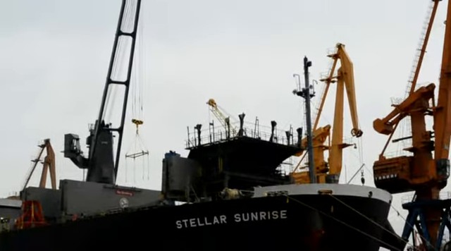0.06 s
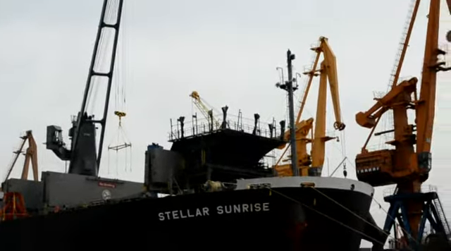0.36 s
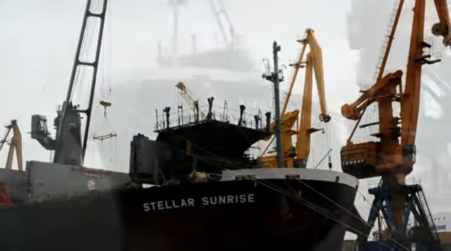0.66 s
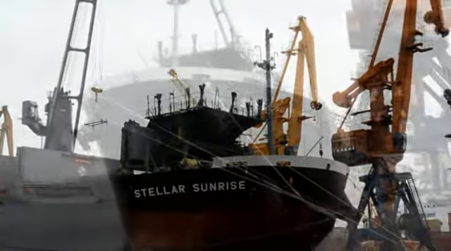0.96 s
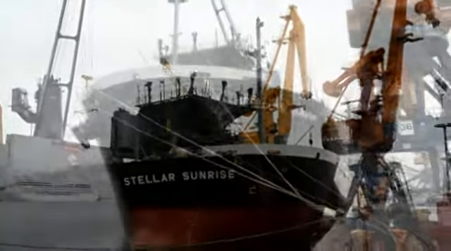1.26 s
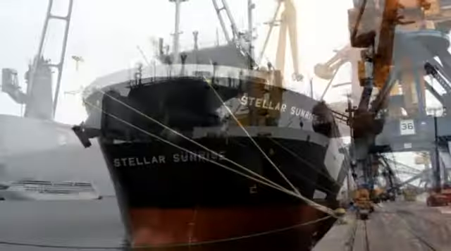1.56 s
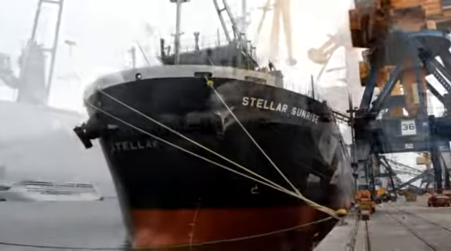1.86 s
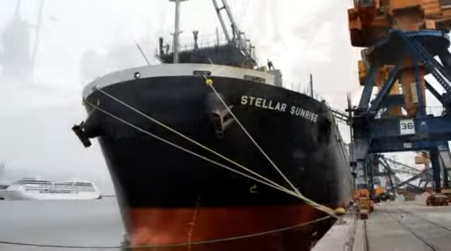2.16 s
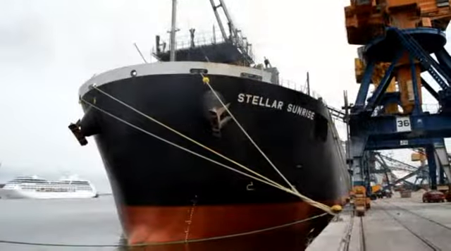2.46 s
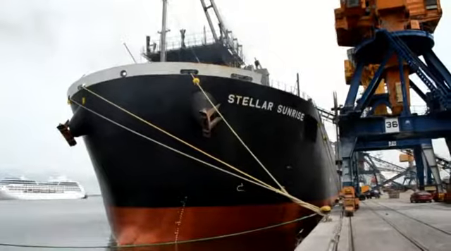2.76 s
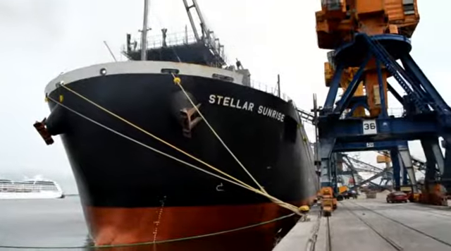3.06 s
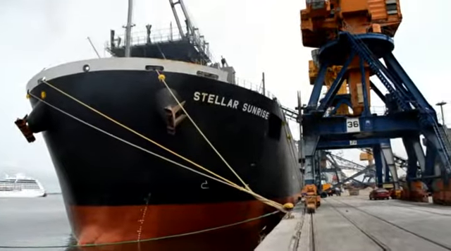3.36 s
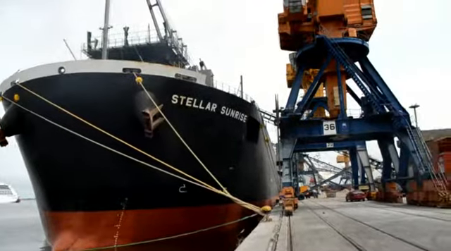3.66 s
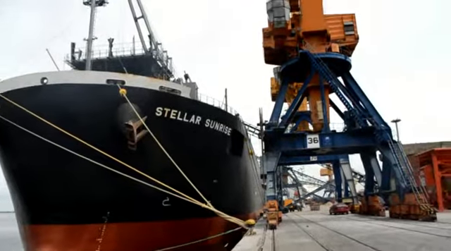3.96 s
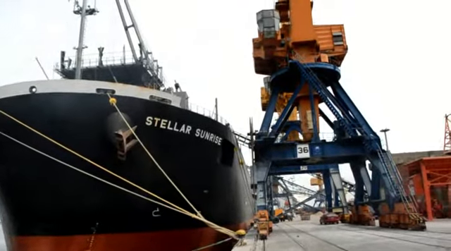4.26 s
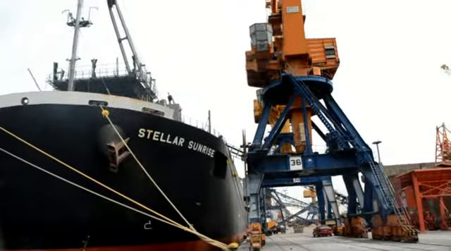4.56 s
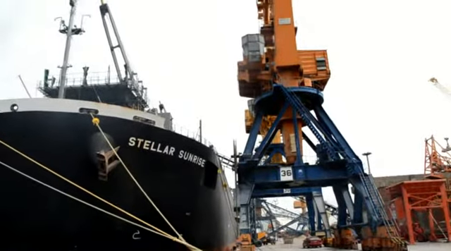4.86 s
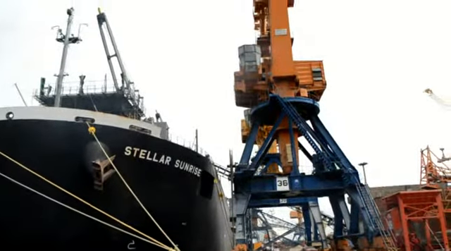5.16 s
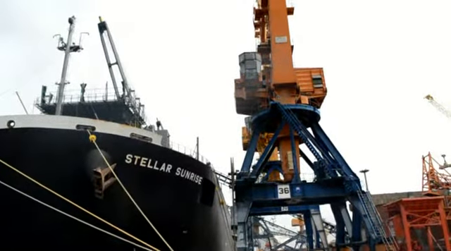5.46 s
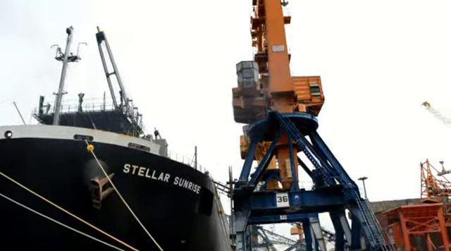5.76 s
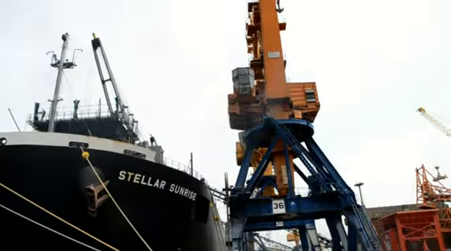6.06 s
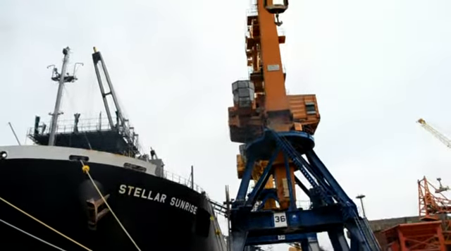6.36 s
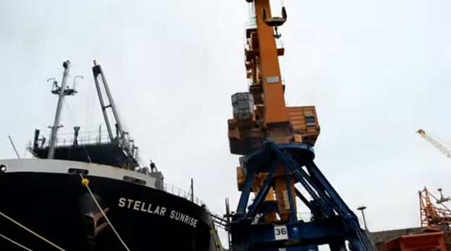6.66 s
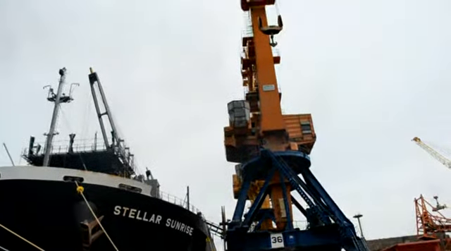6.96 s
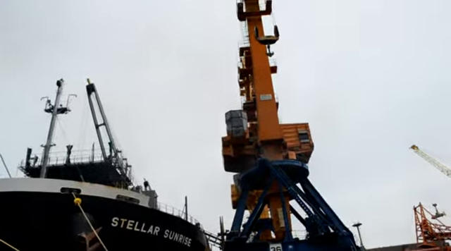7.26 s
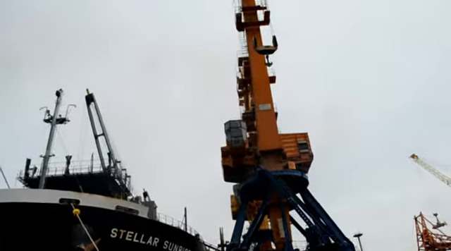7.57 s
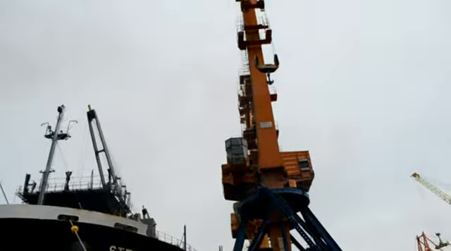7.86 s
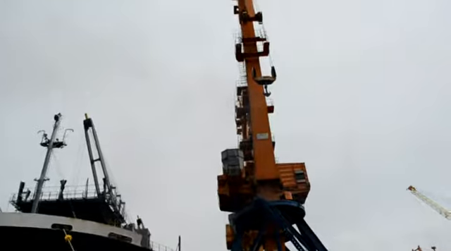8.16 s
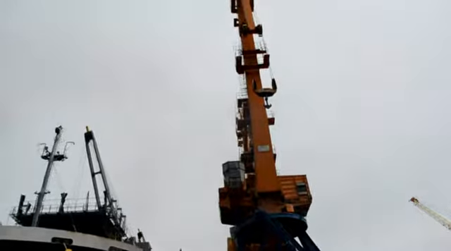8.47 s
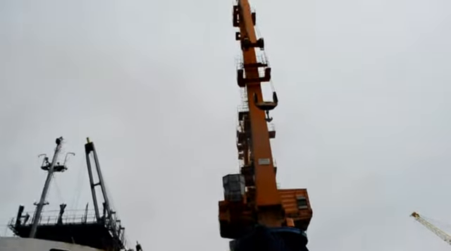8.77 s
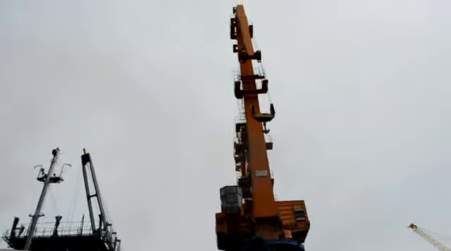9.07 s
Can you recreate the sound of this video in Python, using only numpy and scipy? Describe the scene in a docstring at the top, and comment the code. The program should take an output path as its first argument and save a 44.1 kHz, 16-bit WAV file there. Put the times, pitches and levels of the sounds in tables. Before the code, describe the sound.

Open port rumble and a winch fade into a moored ship's steady engine hum and ventilator roar, with occasional steel knocks and groans.

```python
"""Quayside in a cargo port

The microphone opens at a far berth, where a crane hoists, then fades across to a moored ship's side.
Close up, the diesel generator drones; two more ship's engines and other machinery hum, their overtones
beating, over the air roar of ventilators and the open port. Water spatters faintly, a dry bearing
whines, and along the quay crane steel groans as it slips, steel knocks and mooring gear squeaks."""
import sys
import numpy as np
from scipy import signal
from scipy.fft import rfft, irfft
from scipy.io import wavfile

SR = 44100
rng = np.random.default_rng(int(sys.argv[2]) if len(sys.argv) > 2 else 0)


def pcm_store(signal):
    """Save signal as 16-bit PCM."""
    levels = np.round(np.clip(np.atleast_2d(signal), -1, 1) * 32767)
    wavfile.write(sys.argv[1], SR, levels.astype(np.int16).T)


N = 401751
T = np.arange(N) / SR

# Levels of ship, water, hoist and roar hold with the microphone at their own position, fully faded in.
# generator exhaust note: multiple of the firing rate, level/dB
EXHAUST_ORDERS = [(1, -47), (2, -23), (3, -22.5), (3.25, -36), (4, -35), (5, -49), (6, -44), (6.5, -36),
                  (6.75, -40), (7, -33.5), (8, -46.5)]
# new loads that briefly slow the generator: deepest at t/s, half-length/s, sag in f/Hz
GENERATOR_LOADS = [(1.766, 0.1707, 1.1), (9.08, 0.255, 1.78)]
# hum of two more ship's engines and other machinery, close overtones beating: f/Hz
MACHINE_PITCHES = [75.1, 77.5, 90.3, 105.4, 136, 149.2, 155, 180.3, 272, 316, 351, 361, 376, 451, 498.5]
# the same tones of the hum: level/dB
MACHINE_LEVELS = [-33, -37, -40.5, -44.5, -31.5, -40.5, -30.5, -37.5, -39, -54, -36.5, -35.5, -56, -42,
                  -41.5]
# hoist motor tone: harmonic number, relative level/dB
HOIST_HARMONICS = [(1, -1.5), (6, -22)]
# slips of crane steel: peak t/s, half-length/s, f/Hz, glide/(Hz/s), level/dB
STEEL_SLIPS = [(.61, 0.1, 671, -9, -27), (0.839, .1, 644, -39.5, -34), (7.53, .1, 693, 0, -29.5),
               (7.877, .08, 787, 1, -29), (8.025, .045, 727, -60.5, -21), (8.094, 0.025, 708, 199, -21.5),
               (8.188, 0.063, 739, -40, -21.5), (8.44, .05, 703, -100, -30), (8.7, 0.073, 622, 0, -27)]
# echoes off hull and sheds: delay t/s, relative level/dB
QUAY_ECHOES = [(.047, -13), (.11, -10), (.19, -11)]
# steel knocks on the quay: t/s, level/dB, ring f/Hz, decay/s
STEEL_KNOCKS = [(0.053, -28, 262, 0.026), (1.403, -32, 2450, 0.022), (1.775, -41, 3230, 0.043),
                (2.48, -33, 2500, .05), (4.315, -43, 3993, 0.014), (7.557, -47, 4990, .018),
                (8.418, -50, 5220, 0.011)]
# squeaks of mooring gear: t/s, f/Hz, level/dB
MOORING_SQUEAKS = [(5.52, 7570, -63), (5.74, 7560, -69), (7.11, 7450, -61)]
# swells of the dry bearing's whine: peak t/s, half-length/s, level/dB
BEARING_RUBS = [(1.45, .06, -47), (1.8, .07, -43.5), (2.5, .2, -49), (3.35, 0.18, -45), (3.72, 0.18, -49),
                (4.42, .12, -55), (4.95, 0.092, -45.5), (5.278, .13, -45), (6.02, .11, -41.5),
                (6.65, .11, -48), (7.0, .11, -49), (7.65, .12, -42), (8.15, .15, -54)]
# flares of its thin squeal: peak t/s, level/dB
BEARING_SQUEALS = [(2.56, -60), (3.7, -72), (5.25, -71), (5.72, -68.5), (7.45, -72), (8.82, -71)]
# spectrum of coarse drops: f/Hz, relative level/dB
DROP_SPECTRUM = [(2500, 5), (5500, -9), (7300, 1), (9500, -5.5), (12000, -15), (15700, -22)]
# spectrum of fine spray: f/Hz, relative level/dB
SPRAY_SPECTRUM = [(5000, -11), (10000, 2.5), (12000, -0.5), (13600, 0), (15700, -11)]
# single sharp splashes: t/s, level/dB before their trim
BIG_DROPS = [(2.864, -42), (3.0444, -42), (3.4094, -43), (5.655, -42), (6.0574, -41), (7.0794, -44),
             (7.5577, -44)]
# roar of the open port at the far berth: f/Hz, relative level/dB
PORT_SPECTRUM = [(25, -18), (78, 3), (150, -1), (245, 3.5), (380, -1), (480, -5.5), (700, -2.5), (950, -6),
                 (1350, -6.5), (2000, -14.5), (3000, -28), (5000, -43.5), (9000, -56), (15000, -82)]
# roar of the ventilators at the ship's side: f/Hz, relative level/dB
VENTILATOR_SPECTRUM = [(25, -22), (40, -7.5), (70, -3.5), (130, 2), (270, 0.5), (500, -2.5), (720, -2.5),
                       (1250, -6.5), (2000, -13.5), (3500, -26.5), (5500, -41), (8000, -51), (15000, -60)]


def generator(firing_hz, waver_db, phase_wander, sag_db_per_hz):
    """Diesel exhaust, its orders locked to the crankshaft; moving air unsteadies the higher ones most."""
    sag_hz = sum(hz * swell(s, half_s) for s, half_s, hz in GENERATOR_LOADS)
    firing = turns(firing_hz - sag_hz)
    exhaust = 0
    for order, db in EXHAUST_ORDERS:
        phase = order * (firing + phase_wander * drift(1.9)) + 2 * np.pi * rng.random()
        exhaust += from_db(db + waver_db * np.sqrt(order) * drift(2.1)) * np.sin(phase)
    return np.sqrt(2) * from_db(-sag_db_per_hz * sag_hz) * exhaust  # softer as it slows


def machinery_hum():
    """Two more ship's engines and other machinery, heard from the quay, their overtones beating."""
    tones = zip(MACHINE_PITCHES, MACHINE_LEVELS)
    return sum(from_db(db) * tone(hz, wander=0.0012, waver_db=1.5) for hz, db in tones)


def deck_fan(hz, closest_db, pass_s, pass_half_s):
    """A deck fan sings, loudest as the microphone passes it."""
    distance = np.hypot(1, (T - pass_s) / pass_half_s)  # 1 at the closest point
    return from_db(closest_db) / distance * tone(hz, wander=0.0079, waver_db=4.5)


def hoist(start_s, hz, run_up_hz, run_up_s, load_db, load_s, hum_db):
    """An electric winch at the far berth runs up to speed, loud as it takes the load, then hums on."""
    lag = np.exp(-np.maximum(T - start_s, 0) / run_up_s)
    shaft = turns(hz - run_up_hz * lag)
    effort = from_db(hum_db) + from_db(load_db) * swell(start_s, load_s)
    motor = sum(from_db(db) * np.sqrt(2) * np.sin(k * shaft) for k, db in HOIST_HARMONICS)
    return (1 - lag) * effort * motor


def crane_groans(slip_jitter):
    """Steel slips unevenly on steel; hull and sheds throw the sound back to the microphone."""
    rasp = 1 + 0.45 * drift(90)
    unsteady = 1 + slip_jitter * drift(63)
    direct = 0
    for s, half_s, hz, glide, db in STEEL_SLIPS:
        pitch_hz = (hz + glide * (T - s)) * unsteady
        direct += from_db(db) * swell(s, half_s) * rasp * np.sin(turns(pitch_hz))
    return direct + sum(from_db(db) * np.interp(T - lag, T, direct, left=0) for lag, db in QUAY_ECHOES)


def steel_knocks(spread):
    """Each blow on the quay rings a dense cluster of quickly damped modes."""
    blows = 0
    for s, db, hz, decay_s in STEEL_KNOCKS:
        blows += from_db(db) * decay(s, decay_s) * noise_band(hz / (1 + spread), hz * (1 + spread))
    return blows


def bearing(whine_hz, whine_rest_db, squeal_hz, squeal_rest_db, squeal_half_s):
    """A fluttering whine by the ship; dry rubbing keeps a narrow high resonance ringing above it."""
    rubs = sum(from_db(db) * swell(s, half_s) for s, half_s, db in BEARING_RUBS)
    flares = sum(from_db(db) * swell(s, squeal_half_s) for s, db in BEARING_SQUEALS)
    flutter = from_db(2 * drift(22))
    whine = np.sqrt(2) * flutter * np.sin(turns(whine_hz * (1 + 0.0024 * drift(26))))
    squeal = noise_band(squeal_hz - 45, squeal_hz + 45)
    return (from_db(whine_rest_db) + rubs) * whine + (from_db(squeal_rest_db) + flares) * squeal


def water(drops_db, loss_db_per_s, spray_db, surge_db):
    """Drops and spray surge together by the hull; the drops fade as the microphone turns away."""
    surge = from_db(surge_db * drift(22))
    coarse = coloured(surge * impacts(per_s=9000, size_spread_db=4), DROP_SPECTRUM)
    fine = coloured(surge * impacts(per_s=17000, size_spread_db=5), SPRAY_SPECTRUM)
    return from_db(drops_db - loss_db_per_s * T) * coarse + from_db(spray_db) * fine


def splashes(decay_s, trim_db):
    """A bigger drop bursts in a short bright tick."""
    bursts = sum(from_db(db + trim_db) * decay(s, decay_s) for s, db in BIG_DROPS)
    return bursts * noise_band(2500, 11000)


def mooring_squeaks(half_s):
    """Mooring gear sticks and slips in faint high chirps."""
    chirps = 0
    for s, hz, db in MOORING_SQUEAKS:
        chirp = np.sqrt(2) * np.sin(turns(hz * (1 + 0.007 * drift(120))))
        chirps += from_db(db + 2 * drift(60)) * swell(s, half_s) * chirp
    return chirps


def roar(spectrum, db, sway_db, flutter_db):
    """Turbulent air; the breeze makes its upper part come and go, and the hiss can flutter."""
    noise = coloured(rng.standard_normal(N), spectrum)
    sway = highs(noise, 900) * (from_db(sway_db * drift(5.7)) - 1)
    flutter = highs(noise, 3000) * (from_db(flutter_db * drift(26)) - 1)
    return from_db(db) * (noise + sway + flutter)


def tone(hz, wander, waver_db):
    """One machine tone, a little unsteady in pitch and loudness; rms about 1."""
    gain = from_db(waver_db * drift(3))
    return np.sqrt(2) * gain * np.sin(turns(hz * (1 + wander * drift(3.04))))


def impacts(per_s, size_spread_db):
    """Dense tiny drop impacts of uneven size."""
    sizes = from_db(size_spread_db * np.minimum(rng.exponential(1, N), 4))
    return sizes * rng.choice([-1, 1], N) * (rng.random(N) < per_s / SR)


def swell(peak_s, half_s):
    """A smooth rise and fall of height 1."""
    return np.exp(-((T - peak_s) / half_s) ** 2)


def decay(start_s, decay_s):
    """A sudden onset of height 1 that dies away."""
    return (T >= start_s) * np.exp(-np.abs(T - start_s) / decay_s)


def drift(rate_hz):
    """Random wander: twice smoothed noise of spread 1, one point every 100 samples."""
    pole = np.exp(-200 * np.pi * rate_hz / SR)
    noise = rng.standard_normal(N // 100 + 2002)
    slow = signal.lfilter([1], [1, -2 * pole, pole * pole], noise)[2000:]
    return np.interp(np.arange(N) / 100, np.arange(len(slow)), rms_one(slow))


def turns(hz):
    """Running phase of a frequency, from a random start."""
    return 2 * np.pi * (np.cumsum(hz * np.ones(N)) / SR + rng.random())


def coloured(x, spectrum):
    """Give a steady sound a spectrum; rms 1."""
    hz, db = np.transpose(spectrum)
    f = np.maximum(np.fft.rfftfreq(N, 1 / SR), 1)
    gain = from_db(np.interp(np.log(f), np.log(hz), db)) * np.minimum(f / hz[0], 1) ** 2
    return rms_one(irfft(rfft(x) * gain, N))


def noise_band(low_hz, high_hz):
    """Gently band-passed noise; rms 1."""
    bandpass = signal.butter(2, [low_hz, high_hz], "band", fs=SR, output="sos")
    return rms_one(signal.sosfilt(bandpass, rng.standard_normal(N)))


def highs(x, hz):
    """The part above hz, with no phase shift."""
    return signal.sosfiltfilt(signal.butter(2, hz, "high", fs=SR, output="sos"), x)


def from_db(db):
    """Decibels to gain."""
    return 10 ** (np.asarray(db) / 20)


def rms_one(x):
    """Scale to unit rms."""
    return x / np.sqrt(np.mean(x ** 2) + 1e-20)


def scene(fade_start_s=0.41, fade_length_s=1.91):
    """Two microphone positions: the far berth gives way to the ship's side; the steel carries to both."""
    far = roar(PORT_SPECTRUM, db=-23, sway_db=0.5, flutter_db=0)
    far += hoist(start_s=0.0444, hz=296.2, run_up_hz=20, run_up_s=0.018,
                 load_db=-24, load_s=0.19, hum_db=-31.5)
    near = roar(VENTILATOR_SPECTRUM, db=-20, sway_db=0.63, flutter_db=1.3) + machinery_hum()
    near += deck_fan(hz=980, closest_db=-39.5, pass_s=5.9, pass_half_s=0.41)
    near += bearing(whine_hz=2528, whine_rest_db=-55.5,
                    squeal_hz=6820, squeal_rest_db=-74, squeal_half_s=0.11)
    drone = generator(firing_hz=62.72, waver_db=0.04, phase_wander=0.047, sag_db_per_hz=1.5)
    steel = crane_groans(slip_jitter=0.015) + steel_knocks(spread=0.21) + mooring_squeaks(half_s=0.036)
    near += water(drops_db=-52, loss_db_per_s=0.84, spray_db=-61, surge_db=2.04)
    near += splashes(decay_s=0.0087, trim_db=-5)
    arrived = np.clip((T - fade_start_s) / fade_length_s, 0, 1)
    far_gain = (1 - arrived) ** 0.71
    near_gain = np.maximum(arrived, from_db(-20.5))  # the ship carries faintly to the far berth
    drone_gain = near_gain ** 1.25  # the drone comes in later than the ventilators
    return (far_gain * far + near_gain * near + drone_gain * drone + steel)[None]


def record(dry):
    """The microphone signal is cut steeply above 15.7 kHz."""
    return signal.sosfilt(signal.ellip(14, 0.2, 80, 15700, fs=SR, output="sos"), dry)


dry = scene()
out = record(dry)
pcm_store(out)
```